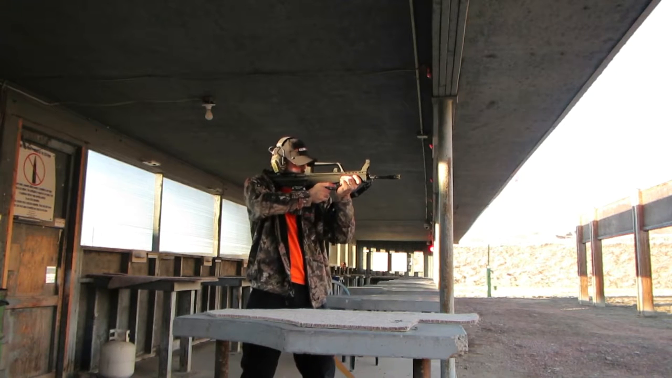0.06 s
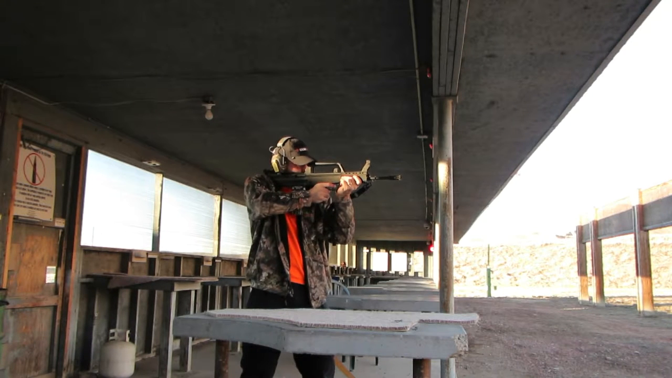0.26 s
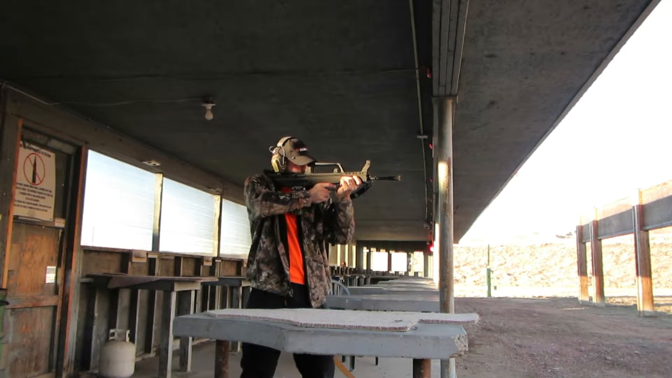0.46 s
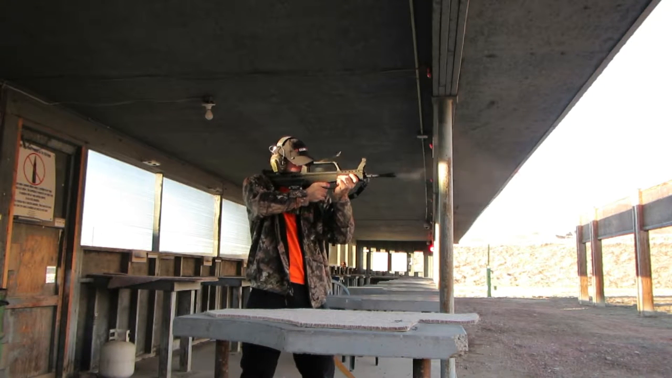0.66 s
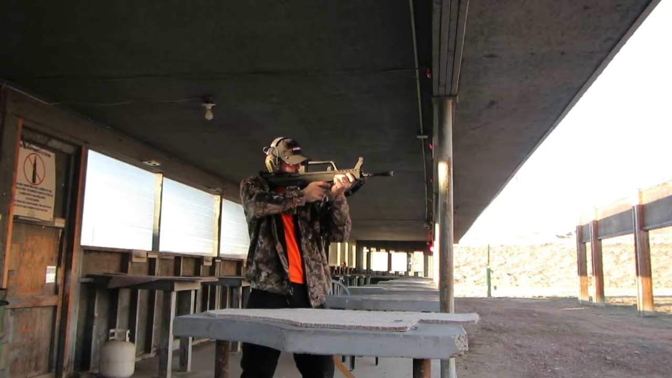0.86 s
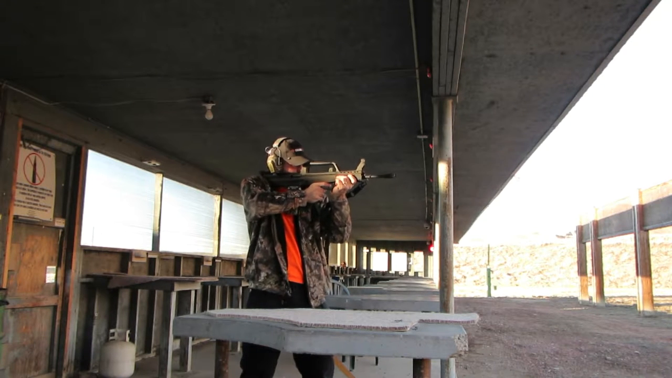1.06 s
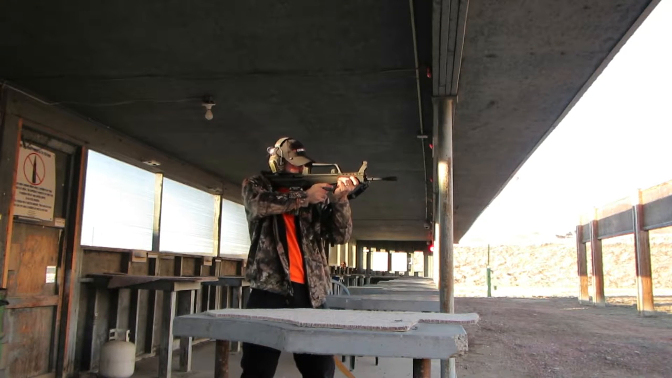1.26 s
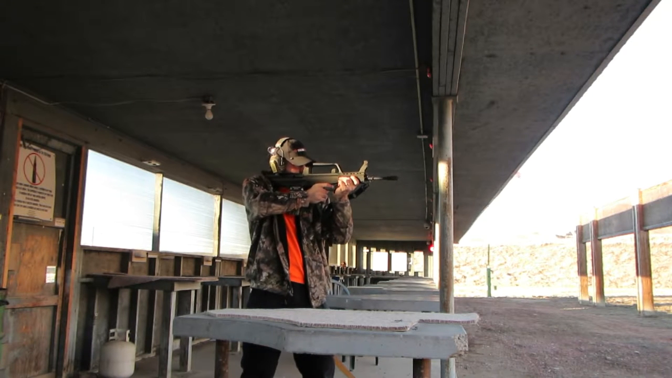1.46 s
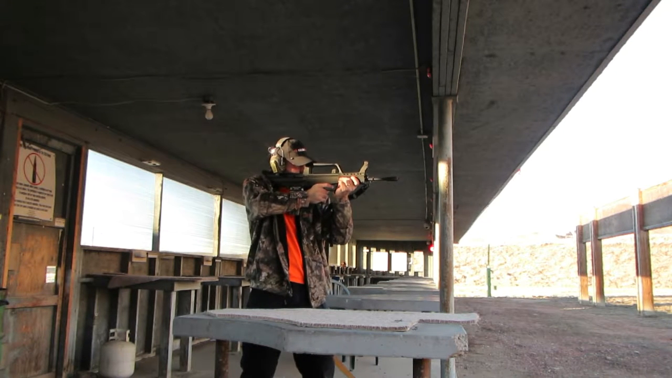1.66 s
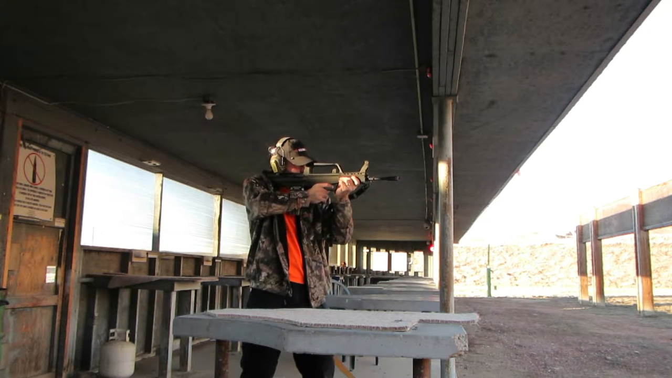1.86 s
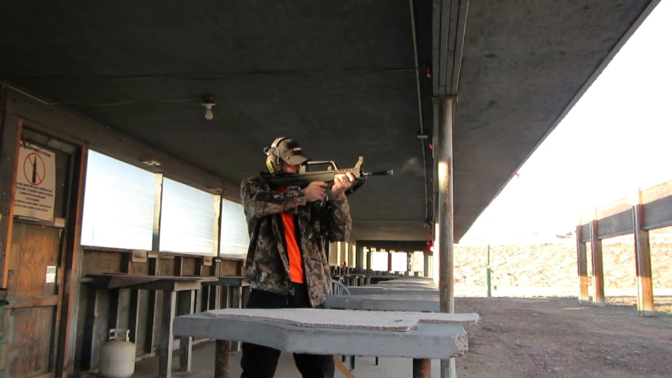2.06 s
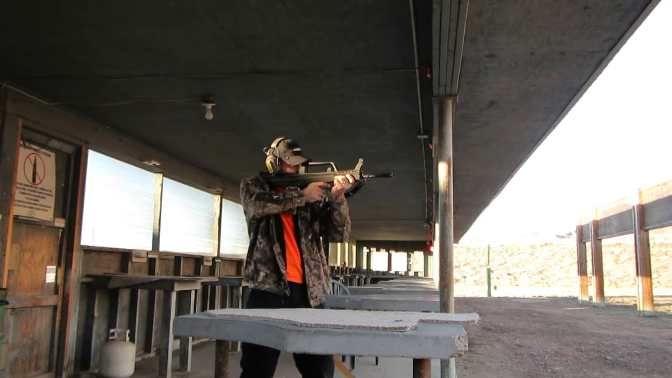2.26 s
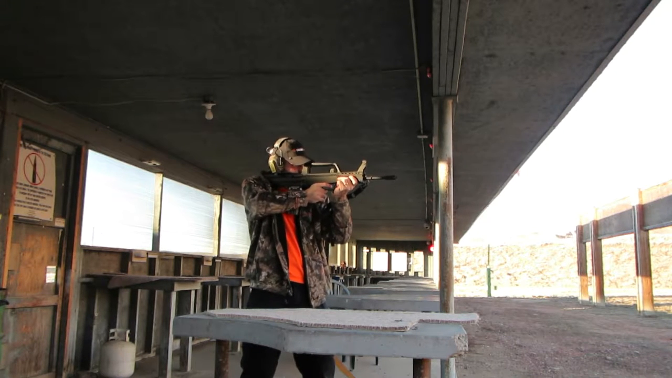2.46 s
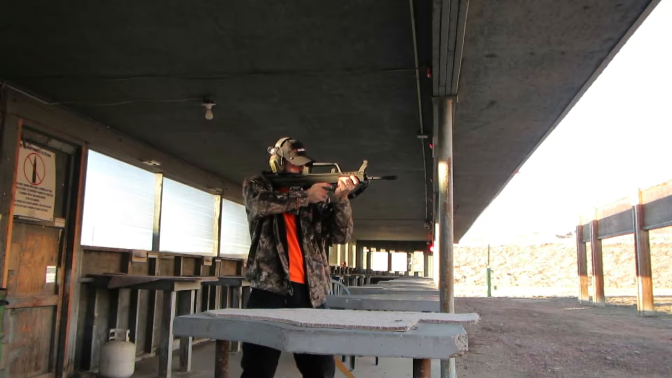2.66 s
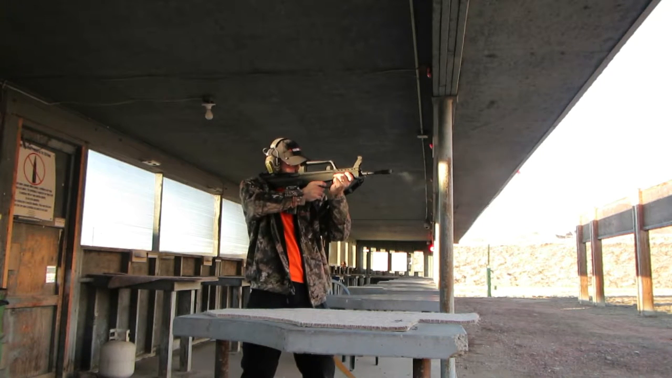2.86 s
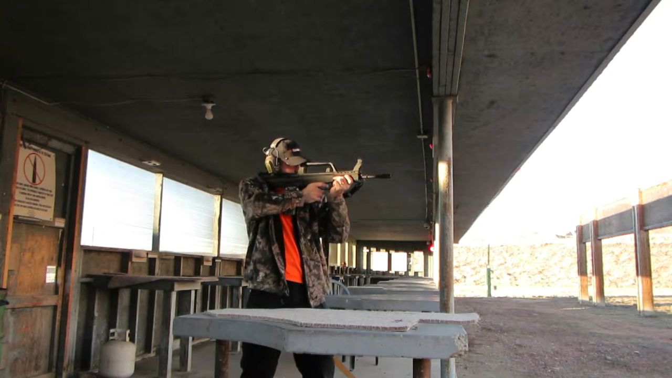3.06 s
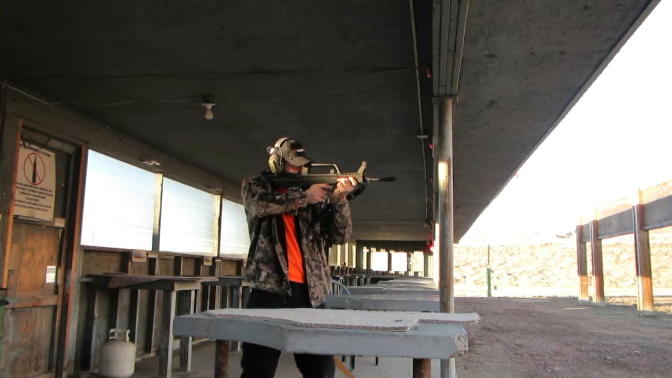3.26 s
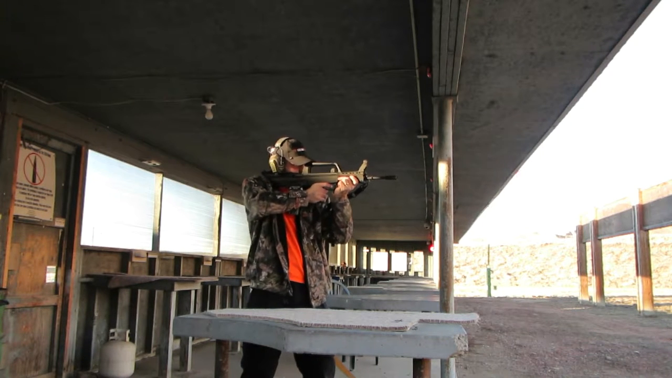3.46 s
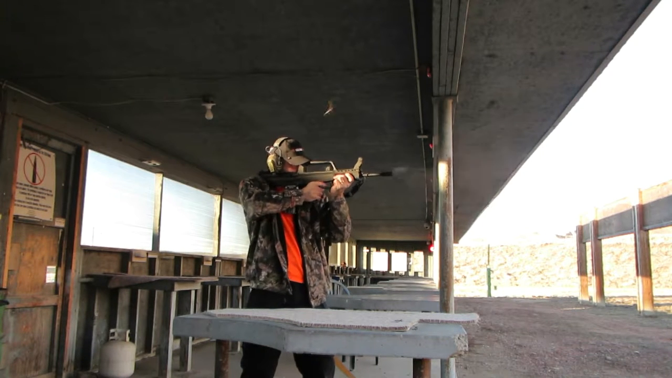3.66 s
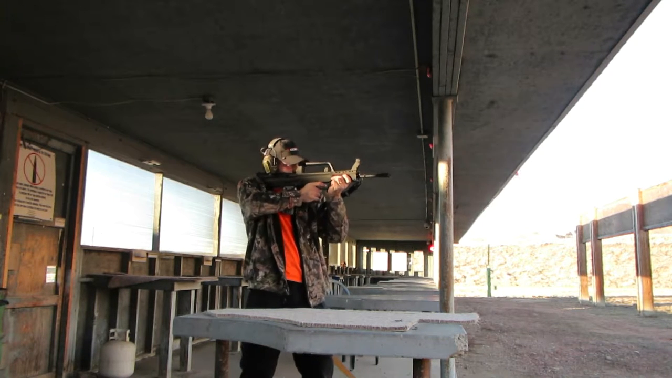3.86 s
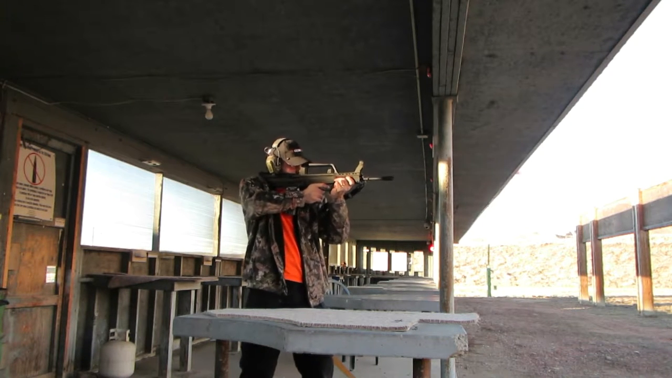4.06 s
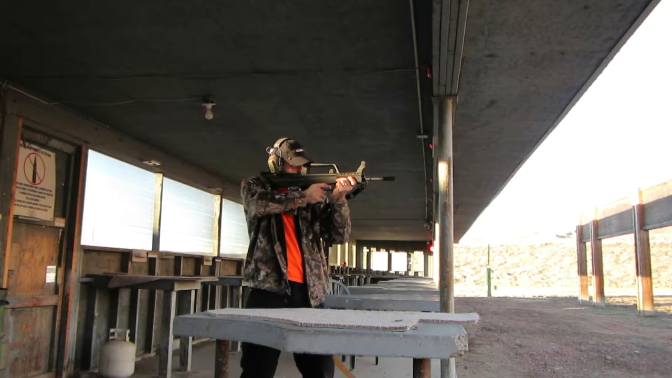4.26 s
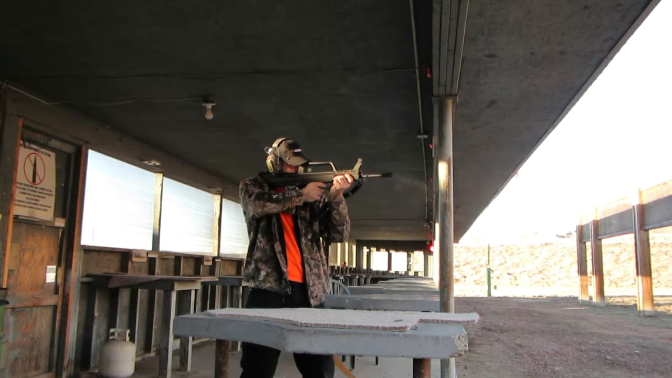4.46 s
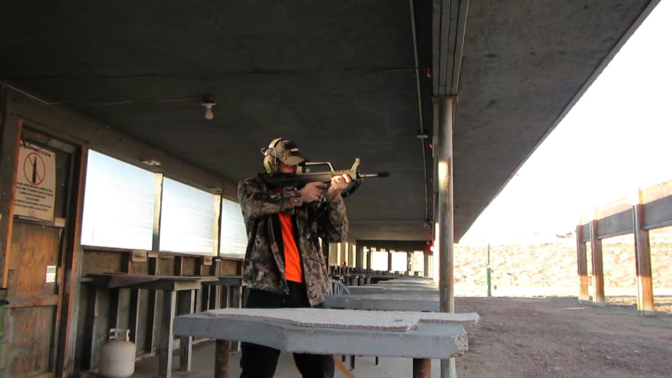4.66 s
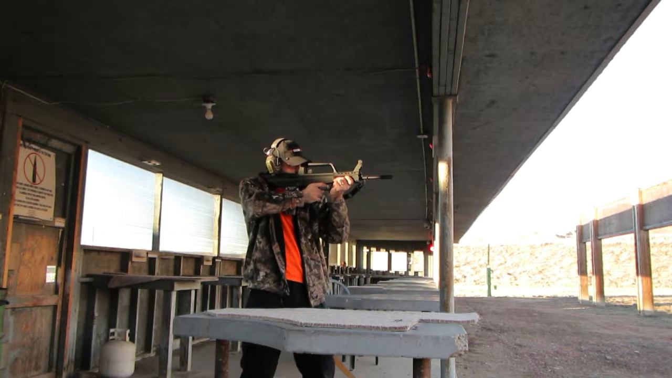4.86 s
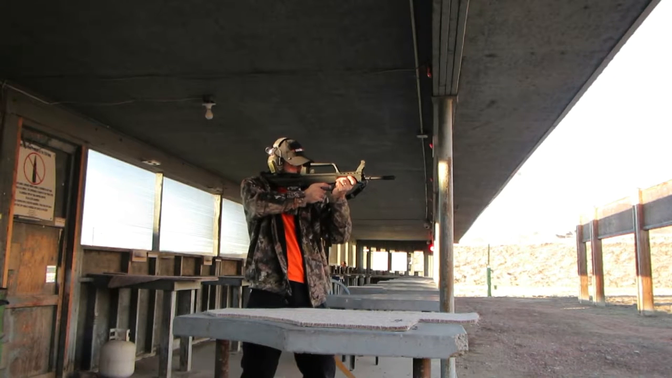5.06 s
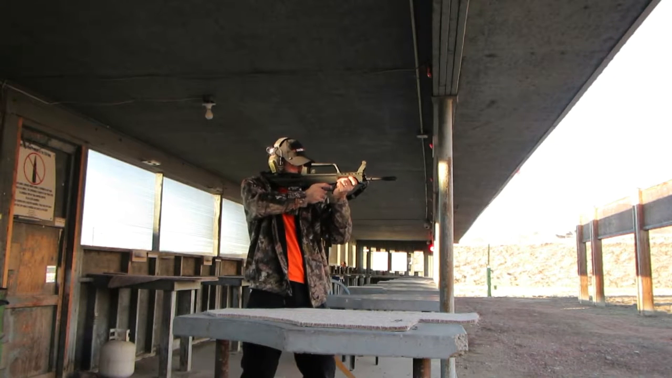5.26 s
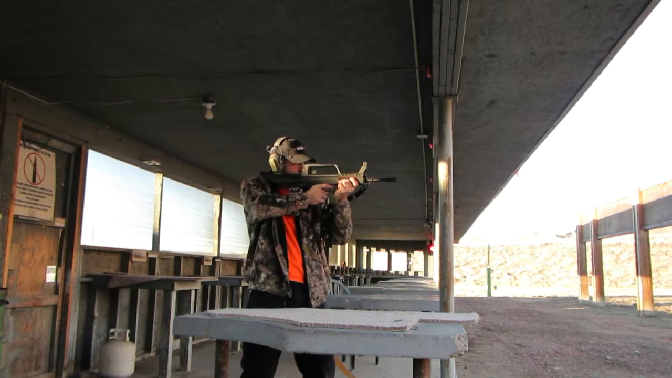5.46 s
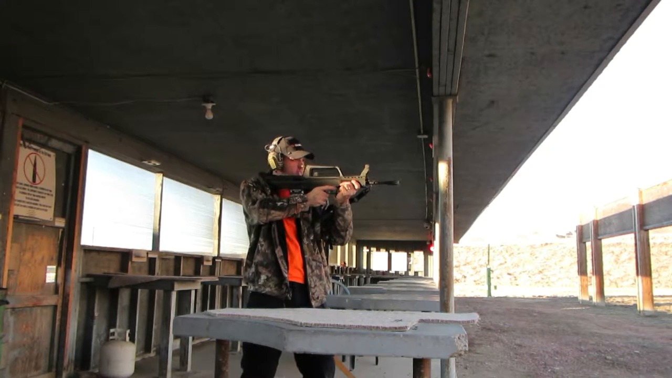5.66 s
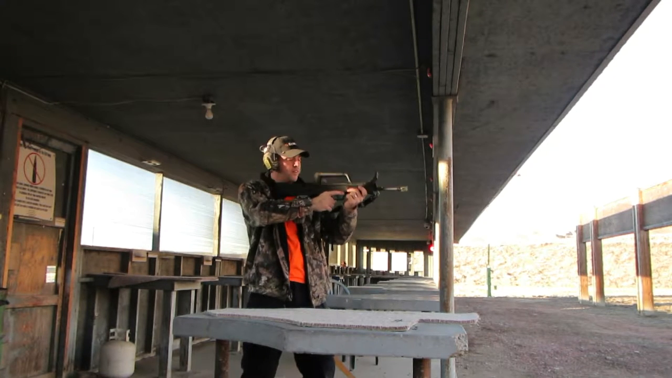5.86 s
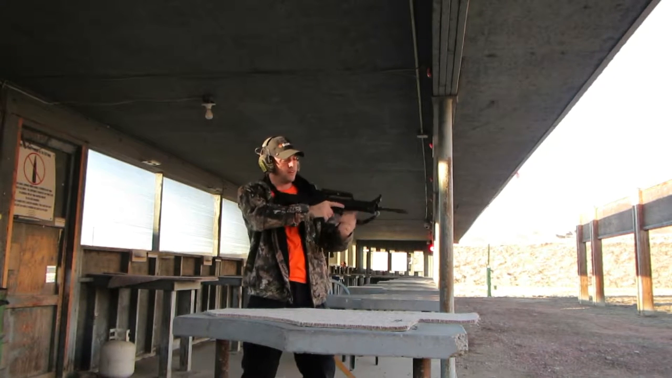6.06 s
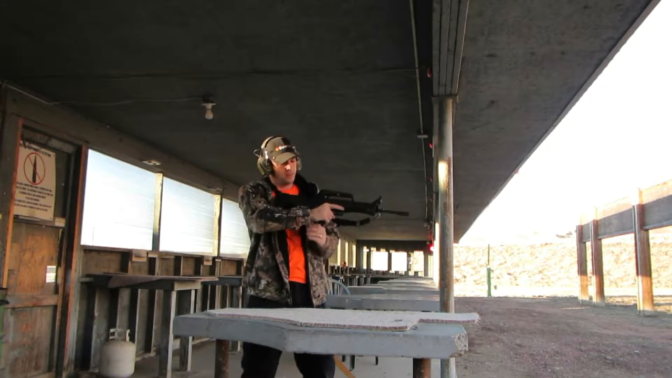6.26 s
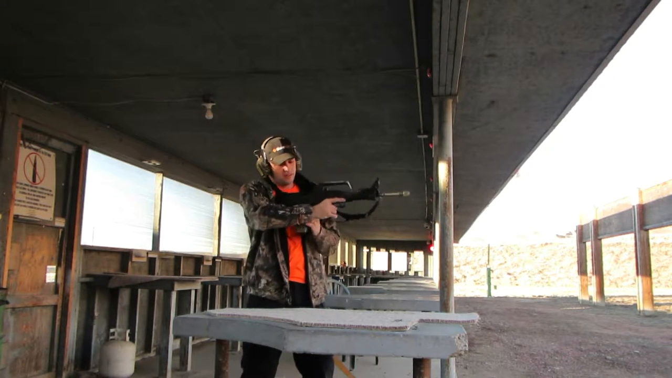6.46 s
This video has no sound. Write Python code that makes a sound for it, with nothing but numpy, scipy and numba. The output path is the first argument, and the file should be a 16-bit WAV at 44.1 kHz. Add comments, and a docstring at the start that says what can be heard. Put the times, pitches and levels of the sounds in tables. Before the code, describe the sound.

A rifle fires five spaced shots beneath a hard shed roof, echoes ringing after each, while empty casings clink on concrete and gusts buffet the microphones.

```python
"""A rifle is fired five times under the roof of an open shooting shed, close by; an earlier shot still fades.
Each shot is one short pressure swing, then fading noise for the echoes, and sine waves for ringing roof and steel.
Empty cases tick and ring on the concrete, and dull noise knocks clack on a bench.
Gusts are filtered random pulses that thump and pop on two microphones, over a quiet outdoor noise.
A limiter presses the loud parts down and an overloaded amplifier rounds their peaks."""
import sys
import numpy as np
from scipy import signal
from scipy.fft import rfft, irfft, next_fast_len
from scipy.io import wavfile
from scipy.ndimage import uniform_filter1d
from numba import njit

SR = 44100
rng = np.random.default_rng(int(sys.argv[2]) if len(sys.argv) > 2 else 0)


def unload_wav(signal):
    """Save mono or channel-first audio to the path in sys.argv[1] as 16-bit WAV at rate SR, clipped to [-1, 1]."""
    wavfile.write(
        sys.argv[1],
        SR,
        np.round(np.clip(np.atleast_2d(signal).T, -1, 1) * 32767).astype(np.int16),
    )


N = 287517  # length in samples, about 6.5 s


def undb(db):
    """Turn decibels into an amplitude factor."""
    return 10 ** (np.asarray(db) / 20)


def fade(t, t60):
    """Amplitude that starts at t = 0 and loses 60 dB in t60 seconds."""
    return (t >= 0) * np.exp(-np.log(1000) * np.maximum(t, 0) / t60)


def across(table, hz):
    """Read the columns of a table at hz, between its rows on a logarithmic frequency axis."""
    f, *columns = np.transpose(table)
    return [np.interp(np.log(hz), np.log(f), column) for column in columns]


def stereo(x, pan_db):
    """Make the left side pan_db louder than the right."""
    return x * undb(np.array([[.5], [-.5]]) * pan_db)


def add(out, x, s):
    """Mix x into out from time s on, cutting off what lies outside."""
    start = int(s * SR)
    x = x[:, max(-start, 0):N - start]
    first = max(start, 0)
    out[:, first:first + x.shape[1]] += x


def lowpass(x, hz):
    """Gently remove what lies above hz."""
    return signal.sosfilt(signal.butter(2, np.clip(hz, 20, SR / 3), fs=SR, output="sos"), x)


def bandpass(x, low_hz, high_hz, order=2):
    """Keep what lies between two frequencies."""
    return signal.sosfilt(signal.butter(order, [low_hz, high_hz], "band", fs=SR, output="sos"), x)


def rifle():
    """Each blast wakes nearly the same echoes, as one shed answers all; moving air changes a little of them."""
    # the shots: (time [s], blast level [dB], ring level of the flying case [dB])
    shots = [(-.62, -2, -60), (.7392, 0, -44), (2.025, 0, -56), (2.8247, 0, -50), (3.7186, 0, -47),
             (4.5006, 0, -60)]
    size, out = 61440, np.zeros((2, N))
    t = np.arange(size) / SR
    repeat = .9  # share of the echo power that is the same for every shot
    blast_db, blast_hz = 16, 800
    flying_hz, flying_t60_s = 9600, .9
    same, loose = shed(size)
    # the direct muzzle wave: one short swing, far above the echoes
    blast = undb(blast_db) * np.sin(2 * np.pi * np.clip((t - .006) * blast_hz, 0, 1))
    steady = np.sqrt(repeat) * same + rings(size) + slaps(size) + blast
    fade_in = np.clip(t / .006, 0, 1) ** 2
    fade_out = np.clip((t[-1] - t) / .3, 0, 1)
    # the spinning case turns its ring towards and away from the microphones
    spin = 1 + .4 * np.sin(2 * np.pi * 14 * t)
    flying = fade(t, flying_t60_s) * np.sin(2 * np.pi * flying_hz * t) * spin
    for k, (s, db, flying_db) in enumerate(shots):
        # swap the sides or flip the sign, so that the changing part differs between neighbouring shots
        turned = np.sqrt(1 - repeat) * loose[::(-1) ** k] * (-1) ** (k // 2)
        shot = undb(db) * (steady + turned) + undb(flying_db) * flying
        add(out, fade_in * fade_out * shot, s)
    return out


def shed(size):
    """Two echo patterns of a blast: bands of noise that crack, build up and die away."""
    # how the shed answers, each level for a third-octave band before the stereo and clump changes:
    # (frequency [Hz], crack level [dB], crack t60 [s], reverberation level [dB], reverberation t60 [s],
    #  build-up time [s], far rumble level [dB])
    answer = [(30, -39, .2, -50, .5, .03, -80), (70, -22, .2, -33, .55, .05, -65),
              (100, -13, .2, -25, .6, .1, -59), (140, -16, .15, -24, .7, .09, -55),
              (250, -15, .12, -8, .6, .1, -52), (500, -11, .12, -4, .53, .08, -53),
              (900, 0, .15, -3, .58, .04, -57), (1500, -7, .2, -12, .56, .05, -62),
              (2000, -9, .24, -16, .52, .08, -66), (2700, -10, .24, -13, .5, .09, -66),
              (3900, -14, .19, -21, .46, .1, -78), (5500, -9, .19, -17, .43, .11, -82),
              (8000, -6, .18, -15.5, .39, .11, -84), (11000, -13, .17, -23, .345, .11, -94),
              (16000, -27, .17, -37, .295, .11, -102)]
    # stereo width: (frequency [Hz], side minus mid [dB])
    side_db = [(60, 2), (110, -7), (200, -7), (380, -7), (700, -9), (1290, -5.5), (2380, -5.5), (4400, -6),
               (8120, -4), (15000, -1)]
    # stereo balance: (frequency [Hz], left minus right [dB])
    lean_db = [(60, 1.0), (110, -0.5), (200, -0.5), (380, -0.5), (700, 1.0), (1290, 3.0), (2380, 1.0),
               (4400, 1.5), (8120, 1.5), (15000, -1.0)]
    far_t60_s = 2.2
    clump_db, clump_s = 1.5, .012  # echoes arrive in uneven clumps of about this length
    step = 32  # samples between level updates
    t = np.arange(0, size, step) / SR
    f = np.fft.rfftfreq(size, 1 / SR) + 1e-9
    mid, side = rfft(rng.standard_normal((2, 2, size)))
    side = side * undb(across(side_db, f)[0])
    ports = stereo(np.stack([mid + side, mid - side], axis=1), across(lean_db, f)[0])
    out = 0
    for hz in 25 * 2 ** np.arange(0, 9.5, 1 / 3):
        crack_db, crack_t60, db, t60, rise, far_db = across(answer, hz)
        # neighbouring bands overlap
        shape = np.cos(np.pi / 2 * np.clip(3 * np.log2(f / hz), -1, 1)) ** 2
        swell = 1 - np.exp(-(t / rise) ** 2)
        crack = (undb(crack_db) * fade(t, crack_t60)) ** 2
        reverberation = swell * (undb(db) * fade(t, t60)) ** 2
        far_rumble = (undb(far_db) * fade(t, far_t60_s)) ** 2
        power = crack + reverberation + far_rumble
        level = np.sqrt(power / np.mean(shape ** 2))
        out = out + np.repeat(level, step) * irfft(ports * shape, size)
    clump = int(clump_s * SR)
    clumps = uniform_filter1d(np.repeat(rng.standard_normal(size), clump)[:size], clump)
    return out * undb(clump_db * clumps / clumps.std())


def rings(size):
    """Roof, benches and steel posts ring as fading sine waves that swell in over three cycles."""
    # the ringing modes: (frequency [Hz], level at the blast [dB], t60 [s], start after the blast [s])
    modes = [(138, 1, .68, .1), (147.5, -20, 1.0, .1), (152, -22, 1.0, .1), (174, -13, .7, .1),
             (212, -5, .65, .08), (222, -16, .7, .08), (262, -7, .65, .08), (287, -14, .55, .08),
             (340, -9, .55, .06), (384, -12, .7, .06), (429, -8, .5, .05), (459, -5, .42, .05),
             (549, 5, .4, .04), (604, -11, .5, .04), (660, -14, .45, .04), (767, -4, .63, .03),
             (815, -12, .6, .03), (843, -10, .55, .03), (900, -10, .72, .03), (916, -10, .55, .03),
             (984, -11, .5, .02), (1045, -11, .5, .02), (1183, -14, .62, .02), (1287, -17, .55, .02),
             (1558, -16, .42, .02), (1785, -53, 2.5, .01), (1798, -62, 2.5, .01), (2224, -62, 2.2, .01),
             (2268, -64, 2.0, .01)]
    out, t = np.zeros((2, size)), np.arange(size) / SR
    skew = .45 * rng.standard_normal(len(modes))  # the two ports hear each mode at a different phase [rad]
    for (hz, db, t60, start), lag in zip(modes, skew):
        swing = undb(db) * fade(t, t60) * np.clip((t - start) * hz / 3, 0, 1)
        out += swing * np.sin(2 * np.pi * hz * (t - start) + np.array([[lag], [-lag]]))
    return out


def slaps(size):
    """Single echoes from the baffles down range, made as short bright bursts of noise."""
    # the slaps: (time after the blast [s], level before the bandpass [dB])
    echoes = [(.088, -22), (.126, -21), (.163, -23), (.288, -39), (.325, -41), (.451, -55)]
    t = np.arange(size) / SR
    level = sum(undb(db) * fade(t - s, .02) for s, db in echoes)
    return bandpass(level * rng.standard_normal((2, size)), 2500, 8000, order=3)


def cases():
    """An empty case lands: a noise tick, its echo under the roof and three brass modes blurred by tumbling."""
    # the landings: (time [s], tick level [dB], pitch factor [1],
    #  low ring level [dB], middle ring level [dB], high ring level [dB])
    landings = [(.3085, -46, 1.01, -56, -48, -58), (.325, -46, 1.01, -60, -56, -62),
                (.622, -66, 1.01, -90, -90, -92), (.685, -57, 1.01, -64, -68, -64),
                (1.582, -72, .96, -72, -90, -90), (1.9416, -76, .96, -74, -90, -90),
                (3.458, -78, .93, -79, -80, -95), (3.641, -78, .93, -78, -76, -95),
                (4.3047, -48, 1.0, -68, -54, -62), (4.311, -46, 1.0, -75, -70, -75),
                (5.1757, -47, .99, -56, -72, -66), (5.485, -72, .99, -71, -77, -88)]
    # the brass modes: (frequency before the pitch factor [Hz], t60 [s])
    brass = [(10950, .26), (14050, .24), (15150, .22)]
    out, t = np.zeros((2, N)), np.arange(SR // 3) / SR
    for s, tick_db, pitch, *ring_db in landings:
        noise = rng.standard_normal((2, len(t))) * undb(tick_db)
        tick = noise * fade(t, .008)
        echo = undb(-14) * bandpass(noise, 2500, 13000) * fade(t, .25)
        x = tick + echo
        for (hz, t60), db in zip(brass, ring_db):
            # slow noise shakes the loudness, partly alike on both sides
            tumble = lowpass(rng.standard_normal((2, len(t))), 130) * 9
            ring = undb(db) * fade(t, t60) * np.sin(2 * np.pi * hz * pitch * t)
            x = x + ring * (1 + tumble[0] + .5 * tumble)
        add(out, x, s)
    return out


def clacks():
    """A dull scuffing knock of fading noise, with fading sine waves for the hollow bench top."""
    # the knocks: (time [s], level [dB], brightness [Hz], hollow ring against the knock [dB])
    knocks = [(.452, -40, 1800, -14), (.472, -34, 2200, -14), (.487, -36, 2600, -12),
              (.503, -43, 2000, -14), (.535, -39, 1300, 7)]
    # the bench top modes: (frequency [Hz], level against the hollow ring [dB], t60 [s])
    bench = [(1180, 0, .05), (820, -4, .06), (1000, -5, .05)]
    out, t = np.zeros((2, N)), np.arange(SR // 3) / SR
    for s, db, bright_hz, ring_db in knocks:
        noise = rng.standard_normal((2, len(t)))
        knock = lowpass(lowpass(noise, bright_hz), 9000) * fade(t, .1)
        dull_tail = undb(-4) * lowpass(noise, 900) * fade(t, .6)
        mid, side = knock + dull_tail
        for hz, mode_db, t60 in bench:
            mid = mid + undb(mode_db + ring_db) * fade(t, t60) * np.sin(2 * np.pi * hz * t)
        onset = np.clip(t / .003, 0, 1)
        add(out, undb(db) * onset * np.array([mid + .5 * side, mid - .5 * side]), s)
    return out


def wind():
    """Sparse eddies of uneven size, random pulses, thump each port in gusts; single pops stand out."""
    # the pops: (time [s], level [dB])
    pops = [(1.677, -46), (1.76, -41), (3.539, -44), (5.409, -39), (5.465, -36), (5.53, -43), (5.56, -32),
            (5.587, -23), (5.593, -30), (5.653, -31), (5.677, -38), (5.696, -37), (5.726, -43),
            (5.917, -29), (5.973, -40), (6.006, -43), (6.084, -21), (6.091, -28), (6.109, -33),
            (6.121, -26), (6.161, -24), (6.264, -40), (6.279, -38)]
    rasp_db, rasp_at_db, rasp_growth = -16, -42, 1.5  # rasp against thump at that gust level; its extra growth
    pop_hz, pop_at_db, pop_sharpen = 450, -30, .17  # brightness at that pop level; stronger pops are sharper
    pop_lean = 1.2  # a pop leans further to the side its gust blows on
    eddies = (rng.random((2, N)) < 260 / SR) * rng.standard_normal((2, N))  # about 260 per second
    eddies = eddies + .2 * eddies[::-1]
    thumps = bandpass(lowpass(eddies, 450), 70, 305)
    rasp = bandpass(lowpass(lowpass(eddies, 900), 1400), 250, 620)
    gain = gusts(np.arange(N) / SR)
    # faster air sheds smaller eddies: the rasp grows faster than the thump
    rasp_gain = undb(rasp_db) * (gain / undb(rasp_at_db)) ** rasp_growth
    out = gain * (thumps / thumps.std() + rasp_gain * rasp / rasp.std())
    t = np.arange(-.01, .01, 1 / SR)
    for s, db in pops:
        u = 2 * np.pi * pop_hz * undb(db - pop_at_db) ** pop_sharpen * t
        swing = u * np.exp(-np.abs(u) ** 1.85 / 2)  # one swing of pressure to either side
        sign = rng.choice([-1, 1])
        left, right = gain[:, int(s * SR)]
        pan_db = pop_lean * 20 * np.log10(left / right)
        add(out, stereo(undb(db) * sign * swing, pan_db), s - .008)  # the swing's middle is 2 ms after s
    return out


def gusts(t):
    """Wind strength at both ports: each gust rises, holds and falls; overlapping gusts add in power."""
    # the gusts: (time of full strength [s], hold [s], level [dB], left minus right [dB])
    blows = [(1.495, .02, -51, -6), (1.675, .035, -45, 2), (1.772, .02, -43, 4), (1.82, .055, -50, -5),
             (1.91, .08, -54, -4), (2.6, .08, -49, 1), (2.72, .07, -57, 1.5), (3.31, .03, -41, 1),
             (3.4, .03, -41, 5), (3.53, .06, -50, 3), (3.63, .07, -53, 4), (4.28, .1, -53, 2),
             (5.125, .06, -52, -3), (5.4, .09, -45, -5.5), (5.55, .05, -39, -5), (5.63, .04, -42, -6),
             (5.72, .03, -48, -6.5), (5.845, .02, -44, -1), (5.922, .02, -41, 6), (5.97, .08, -48, 6),
             (6.075, .08, -41, 6), (6.2, .02, -52, 6), (6.262, .03, -48, 5), (6.32, .04, -54, -1.5),
             (6.415, .05, -45, 1.5), (6.49, .04, -49, -6)]
    rise_db_per_s, fall_db_per_s = 560, 310
    power = 1e-12
    for s, hold, db, pan_db in blows:
        before = rise_db_per_s * np.maximum(s - t, 0)
        after = fall_db_per_s * np.maximum(t - s - hold, 0)
        power = power + stereo(undb(db - before - after), pan_db) ** 2
    return np.sqrt(power)


def air():
    """Quiet outdoor floor: steady noise, shaped over frequency."""
    # the colour of the noise: (frequency [Hz], relative level per hertz [dB])
    colour = [(18, -30), (30, -6), (110, 0), (500, -14), (1600, -22), (2600, -30), (3800, -40), (7000, -39),
              (11000, -43), (16000, -52)]
    size = next_fast_len(N)
    f = np.fft.rfftfreq(size, 1 / SR) + 1e-9
    x = irfft(rfft(rng.standard_normal((2, size))) * undb(across(colour, f)[0]), size)
    return undb(-66) * x[:, :N] / x.std()


def scene():
    """All sources together, as they reach the microphones."""
    return rifle() + cases() + clacks() + wind() + air()


@njit
def follow(peak, attack, release):
    """Envelope that jumps up fast and sinks slowly."""
    out, e = np.empty(len(peak)), 0.
    for i in range(len(peak)):
        e += (peak[i] - e) * (attack if peak[i] > e else release)
        out[i] = e
    return out


def record(dry):
    """A limiter shared by both sides, an overloaded amplifier, a dip from the housing and a cut top."""
    limit_db, ratio, attack_s, release_s = -1.3, 20, .00012, .05
    ceiling, lopsided = .76, .03
    housing_hz, housing_width_hz, housing_share = 3750, 1250, .6
    top_hz = 16300
    ahead = np.roll(np.abs(dry).max(0), -96)  # the limiter looks 96 samples (about 2 ms) ahead
    envelope = follow(ahead, 1 / (attack_s * SR), 1 / (release_s * SR))
    held = dry * np.maximum(envelope / undb(limit_db), 1) ** (1 / ratio - 1)
    # rounded, slightly lopsided peaks add overtones and difference tones while the level is high
    bent = np.tanh(held / ceiling)
    bent = ceiling * (bent + lopsided * bent * bent)
    bent = signal.sosfilt(signal.butter(1, 40, "high", fs=SR, output="sos"), bent)
    dip = signal.lfilter(*signal.iirpeak(housing_hz, housing_hz / housing_width_hz, fs=SR), bent)
    top_cut = signal.ellip(10, .2, 70, top_hz, fs=SR, output="sos")
    return signal.sosfilt(top_cut, bent - housing_share * dip)


dry = scene()
out = record(dry)
unload_wav(out)
```